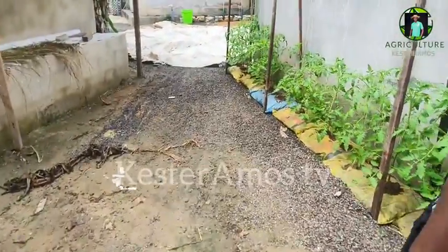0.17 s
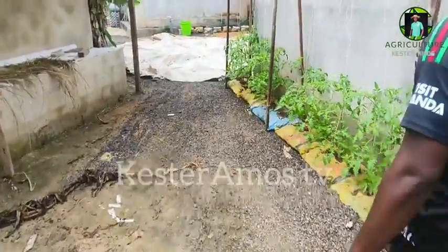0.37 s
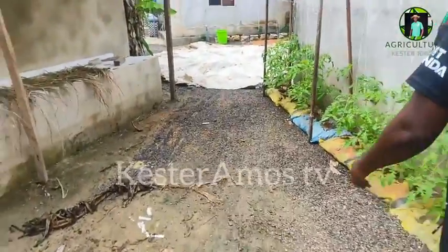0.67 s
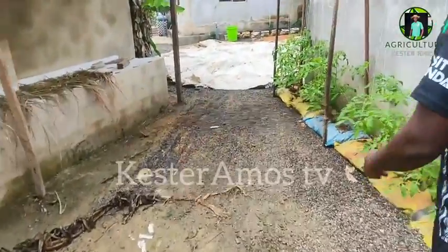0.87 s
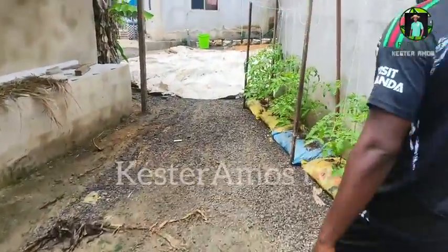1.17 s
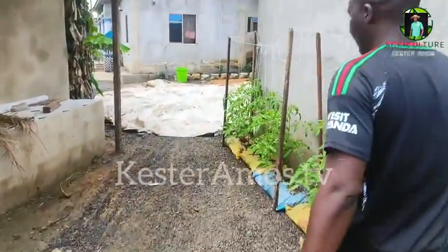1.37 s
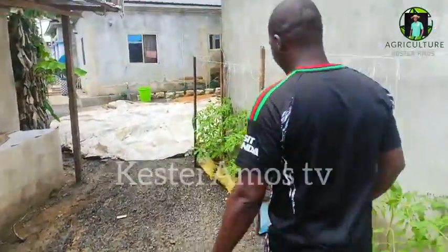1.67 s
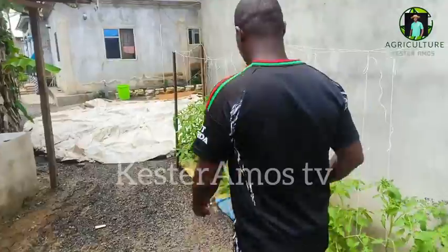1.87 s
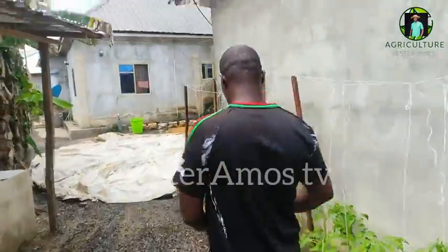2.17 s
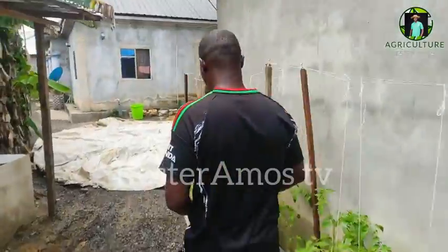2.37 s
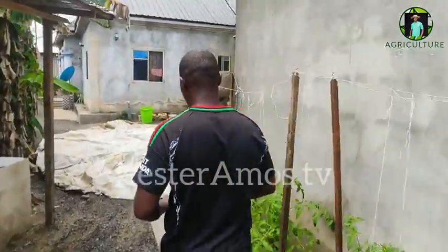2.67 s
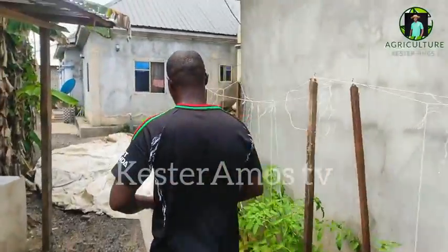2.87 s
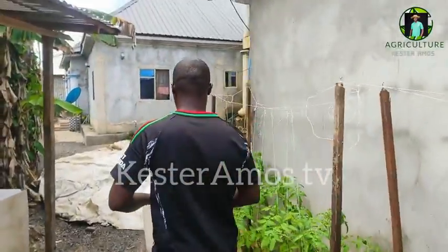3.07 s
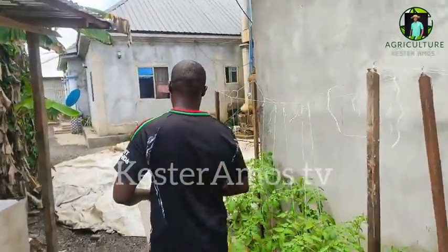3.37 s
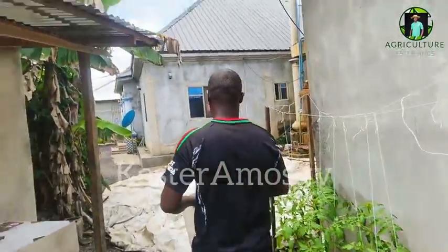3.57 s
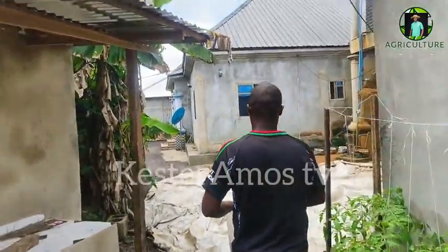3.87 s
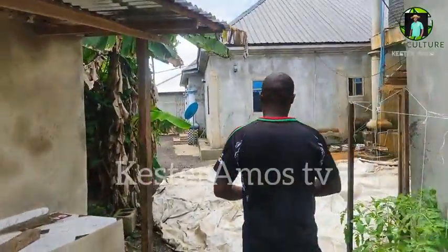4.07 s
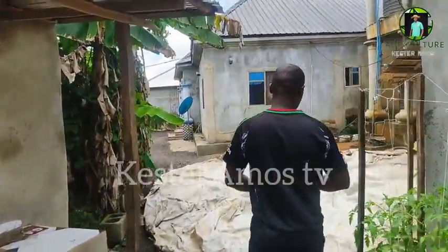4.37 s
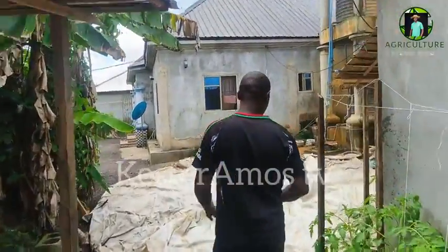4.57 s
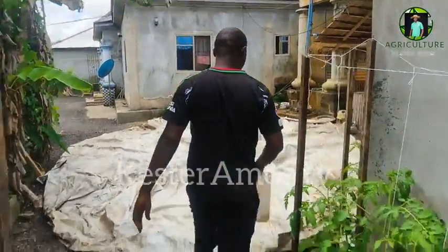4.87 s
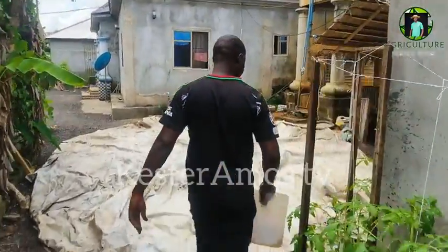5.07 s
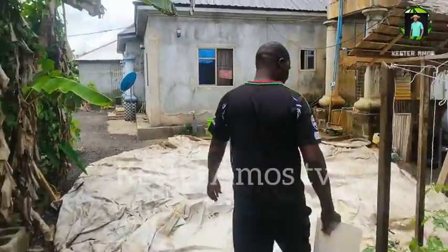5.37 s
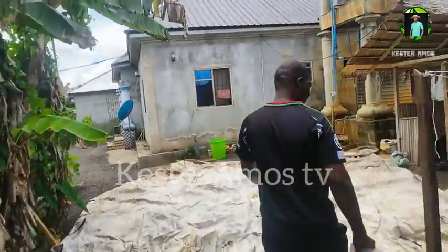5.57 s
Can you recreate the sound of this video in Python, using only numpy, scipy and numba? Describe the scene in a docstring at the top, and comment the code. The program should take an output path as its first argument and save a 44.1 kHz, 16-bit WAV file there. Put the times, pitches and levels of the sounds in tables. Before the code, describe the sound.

A walker carrying a small microphone treads a gravel path beside close walls. The start is almost silent, then gritty, mid-pitched crunches arrive, each with clicking pebbles, a short scrape and low body thumps. Brief whistling swishes join some later strides. Between steps only faint steady air remains, and the crunching continues to the end.

```python
"""Footsteps on gravel between two walls, heard by a small microphone that a walker carries.
At first there is only faint grinding; near 1 s the first strong step comes: knocking grains and cracking stones.
More steps follow, each with low jolts of noise and a wavering hum; narrow noise bands make soles sing.
From 2.9 s some strides add a swish in two whistling noise bands; the loudest crunch comes near 4.5 s.
Crunching goes on to the last swish near 5.7 s; between steps only faint steady air is left."""
import sys
import numpy as np
from scipy import signal
from scipy.fft import rfft, irfft
from scipy.io import wavfile
from scipy.ndimage import uniform_filter1d, map_coordinates
from numba import njit

SR = 44100
rng = np.random.default_rng(int(sys.argv[2]) if len(sys.argv) > 2 else 0)


def persist_wave(psi):
    """Save psi, clipped to +-1, as 16-bit WAV."""
    counts = np.round(np.clip(psi, -1, 1) * 32767).astype(np.int16)
    wavfile.write(sys.argv[1], SR, np.atleast_2d(counts).T)


N = 252693

# All step levels are those before the walls and the path colour are added.
# The sole presses into the gravel: peak t/s, rise/(dB/s), fall/(dB/s), pebble level/dB, pebble f/Hz,
# then grit level/dB, sand level/dB and hollow scrape level/dB, each above the pebbles
SOLE_PRESSES = [(0.0, 2860.0, 61.5, -76.5, 1650, 1, 0, 13), (0.126, 386.5, 286.5, -64, 1584, 1, 3, -28),
                (0.194, 197.5, 242, -59.5, 1377, -4.5, -32, -36.0),
                (0.357, 291, 126.5, -75, 1260, 0.5, -9, 1),
                (0.407, 2500.0, 309.5, -62, 1373, -61, -16, -64),
                (0.962, 1539.5, 216, -44.5, 1334, -1.5, -3.5, -4),
                (0.992, 991.5, 233, -32, 1245, -7, -40, -4),
                (1.147, 191.5, 127, -49.5, 1284, -40, 2.5, 10.5),
                (1.23, 148, 127.5, -59.5, 1573.0, -13, 4.5, 19.5),
                (1.377, 842.5, 150, -33, 1786, -3, -7.5, -2),
                (1.427, 2861, 158, -35.5, 1830, -0.5, -4, -2.5), (1.52, 493.5, 111, -40, 1576, -4, -7, 2),
                (1.652, 89, 501.5, -54.5, 1536, 4, 6.5, 14), (1.81, 5000, 337.5, -46, 1560, 1.5, -6, 9),
                (1.852, 106, 356.5, -75.5, 1484.0, 13.5, 4, 31),
                (2.003, 83, 101, -88.5, 1900, 23, 15.5, 33.5),
                (2.136, 500.5, 180.5, -83, 1345.0, 6, 34, 33),
                (2.167, 590.5, 196.5, -36.5, 1406, -3, -12.5, -11),
                (2.27, 202, 298.5, -53, 1240, -1.5, 0, -24), (2.333, 247.5, 355, -48, 1455, -22, -18, -38),
                (2.402, 430, 101.5, -69.5, 1460, -4, -5, 5), (2.774, 570, 279, -43, 1810, -4.5, -13.5, -10),
                (2.921, 129, 190.5, -61, 1670, 2, 0.5, 2), (3.054, 217.5, 76, -72.5, 1563, -2, -7, 0.5),
                (3.325, 769.5, 244, -33.5, 1827, -4.5, -11, -0.5),
                (3.446, 770, 317, -33.5, 1424, -16, -34, -5), (3.48, 1001, 314, -39, 1560, -4, -18, 0),
                (3.584, 300, 237.5, -46, 1460, 0.5, -9.5, -5),
                (3.787, 2500.0, 53, -46, 2167.0, -8.5, -28, -6.5), (3.89, 177, 93, -50, 1590, -10, -34, -1),
                (3.938, 605, 347, -34.5, 1444, -6.5, -7.5, -6),
                (3.978, 613, 492.5, -29.5, 1364, -13, -20, 2),
                (4.027, 380, 568, -40.5, 1690, -6, -10, -36.0),
                (4.103, 161.5, 245.5, -43.5, 1494, -16.5, -22, -31),
                (4.241, 1049.5, 140.5, -43, 1415, -8, -14.5, -33),
                (4.287, 586, 490.5, -27, 1480, -17.5, -30.5, -19.5),
                (4.361, 1250.0, 285.5, -42, 1276, -33, -30, -4), (4.479, 693, 513, -64, 1197, -9, -4, 2),
                (4.529, 998, 263.5, -25.5, 1665, -9, -12, -5),
                (4.573, 369, 148.5, -38, 1707, -9.5, -32, -5.5),
                (4.658, 1182, 57.5, -62.5, 1340, -22.0, -8, -13),
                (4.838, 609, 290, -34, 1423, -7.5, -18, -2.5),
                (4.911, 909, 206.5, -38, 1590, -7.5, -19, -5.5),
                (5.019, 697, 305, -41, 2165, -8.5, -6, -10),
                (5.159, 1669.5, 252, -49, 1160, -2.5, -27.5, -21),
                (5.204, 347.5, 301, -41.5, 1465, -2.5, -17, -7.5),
                (5.276, 280.5, 498.5, -80, 2170, 28, 28, 27),
                (5.323, 1049, 226, -40.5, 1360, -15, -29, -36.0),
                (5.413, 624.5, 287.5, -42, 1480, 2, -42, -31),
                (5.477, 146, 282.5, -37.5, 1410, -21, -30, -24),
                (5.533, 1431, 282.5, -36, 1510, -9, -30, -3.5),
                (5.633, 1543, 215, -43.5, 1287, -20, -14.5, -36.0)]
# Single stones giving way: t/s, strength level/dB, ring f/Hz, bright tick level/dB above the strength
STONE_CRACKS = [(0.95, -45, 1330, -7), (0.987, -18.5, 1110, -14), (1.008, -16, 1110, -4.5),
                (1.027, -22.5, 1340, -15), (1.35, -32.5, 880, -20), (1.374, -18, 2270, -32),
                (1.396, -15.5, 1275, -18), (1.433, -14.5, 2460, -6), (1.511, -20, 1600, -19),
                (1.594, -33.5, 1340, -6), (1.8086, -30, 1840, 9), (2.0, -40.5, 2500, -15),
                (2.132, -34, 990, -2), (2.168, -26.5, 965, -16), (3.286, -44.5, 2620, 14.5),
                (3.309, -29, 2390, -17), (3.32, -29, 2190, 14.5), (3.435, -20, 1310, -20),
                (3.785, -32.5, 2780, -29), (3.932, -32, 1400, 10), (3.97, -12.5, 1390, -18),
                (4.236, -40, 1710, 6), (4.279, -19, 2250, -28), (4.353, -26.5, 1460, -27),
                (4.474, -32, 833, -12), (4.525, -10, 1960, -20), (4.534, -12.5, 1700, -18),
                (4.658, -27.5, 1340, -20), (4.804, -39, 1000, -16), (4.82, -22.5, 1760, -19),
                (4.849, -15.5, 1580, -29), (4.916, -22, 1590, -4), (5.154, -35, 1010, -10),
                (5.194, -26.5, 1120, -14), (5.326, -19, 1275, -30.5), (5.388, -28, 1280, -18),
                (5.474, -22, 1410, -30), (5.528, -19, 1480, -31), (5.533, -22, 1540, -13),
                (5.632, -25, 1530, -12.5)]
# A dragged or twisted sole sings: start t/s, length t/s, centre f/Hz, one-pass width f/Hz, level/dB
SOLE_SCUFFS = [(0.133, 0.16, 1090, 150, -63), (0.105, 0.14, 4800, 400, -65.5),
               (1.076, 0.25, 2065, 198, -54), (1.086, 0.28, 846, 148, -61), (1.07, 0.23, 3930, 610, -65),
               (1.135, 0.15, 562, 83, -43.5), (1.808, 0.06, 4270, 350, -55), (1.862, 0.32, 724, 149, -57.5),
               (2.239, 0.085, 631, 78, -46), (2.377, 0.041, 1510, 198, -53), (3.041, 0.07, 1560, 300, -66),
               (3.552, 0.075, 917, 60, -48.5), (3.768, 0.093, 323, 49.7, -50),
               (4.088, 0.11, 374, 59.7, -49), (4.741, 0.026, 673, 90, -52), (5.02, 0.21, 490, 50, -50),
               (5.518, 0.064, 345, 150, -44.5)]
# Colour of the path from ground to microphone, rippled by a close reflection: f/Hz, level/dB
PATH_COLOUR = [(250, -1), (400, -8.5), (540, -5.5), (700, -2), (2400, 1.5), (3100, -3.5), (4600, 4.5),
               (5700, -0.5), (6900, 4.5), (8000, -7), (8900, 3), (10200, -6.5), (11200, 3.5), (12300, -2),
               (13000, -52)]
# Shocks through the walker's body, with a low hum that swells alongside: peak t/s, rise/(dB/s), fall/(dB/s),
# jolt level/dB, # thud level/dB above the jolt (before the thud resonance's own level), hum level/dB
BODY_SHOCKS = [(0.0, 2860.0, 148, -48.5, -18.2, -76), (0.146, 90.0, 66, -61.5, -21, -77),
               (0.39, 159, 133, -56, -29, -71.5), (0.994, 800.0, 176, -27, -1, -38.5),
               (1.176, 120.0, 63, -47.5, -16, -68), (1.42, 380.0, 330.0, -46, -14, -60),
               (1.58, 152, 470.0, -40, -13, -78), (1.706, 173, 314, -38.5, -5.5, -44),
               (1.809, 480.0, 162, -52, -25, -57), (1.972, 560.0, 368, -32, -7.5, -48.5),
               (1.978, 150.0, 76, -44, -8, -59), (2.17, 560.0, 420.0, -26.5, -3.5, -47.5),
               (2.185, 710.0, 174, -35.5, 5, -44.5), (2.246, 200.0, 320.0, -37.5, 4.5, -43.5),
               (2.303, 180.0, 150, -40, -11, -54), (2.481, 49, 77, -58, -12, -72),
               (2.772, 802, 162, -36.5, -5, -60), (2.845, 354, 770.0, -67.3, -5.1, -37),
               (2.868, 1179.5, 800.0, -32, -10, -44.5), (2.914, 470.0, 353, -32.5, -13, -40),
               (2.985, 1328, 301, -60, 4, -43), (3.142, 37, 152, -54.5, -23, -69),
               (3.28, 896, 300.0, -56, -11, -68), (3.341, 415, 192, -22.5, -19, -32.5),
               (3.423, 90.0, 118, -33, -7.5, -51.1), (3.517, 1430.0, 670.0, -29, -8, -41.5),
               (3.65, 112, 130.0, -47.5, -12, -44.5), (3.75, 1668, 70.0, -56, -7, -54),
               (3.95, 430.0, 570.0, -64.9, -7.9, -44), (4.039, 180, 198, -28, -9, -42.5),
               (4.126, 400.0, 346, -28.5, -9.5, -57), (4.324, 155, 247, -52, -24, -71),
               (4.474, 176, 2496, -44, -20, -59), (4.557, 345, 743.5, -22, -7, -37),
               (4.634, 384, 203, -34, 4, -41.5), (4.705, 50.0, 63, -48.5, -13, -67.5),
               (4.921, 558, 100.0, -54, -19, -69), (5.049, 300.0, 340.0, -38.5, -16, -60.5),
               (5.21, 605, 305, -43.5, -22, -73), (5.334, 177, 253, -34, -11, -47),
               (5.539, 1430.0, 540.0, -57, -8.7, -64), (5.635, 1331, 327, -44.5, -16, -51)]
# Resonances of jolt, thud and hum: centre f/Hz, one-pass width f/Hz, relative level/dB
JOLT_RESONANCES = [(18.9, 24.3, 5), (53, 320, -14.5)]
THUD_RESONANCES = [(91.6, 35, -3)]
HUM_RESONANCES = [(170.7, 20.8, 1.5), (255.6, 50, -3.5)]
# Swishes: peak t/s, rise/(dB/s), fall/(dB/s), lower band level/dB,
# upper band level/dB above the lower, lower band f/Hz
SWISH_STROKES = [(2.862, 327, 191, -42, 3.5, 3273), (3.201, 252.5, 250, -63.5, -9.5, 3280),
                 (4.412, 399, 245, -51.5, -5, 3334), (4.504, 425, 292, -44.5, 4.5, 3257),
                 (5.018, 395, 245, -45, 7, 3295), (5.058, 402, 398, -43, -3, 3250),
                 (5.12, 333, 396, -52, -0.5, 3340), (5.725, 550, 400, -46.5, 4.5, 3290)]
# The two whistling bands of the swish: centre f/Hz, one-pass width f/Hz, relative level/dB
SWISH_LOW_BAND = [(3314, 230, 0.0055)]
SWISH_HIGH_BAND = [(6800, 380, -4), (6220, 810, -15)]
# Tone of the quiet air in the yard: f/Hz, relative level/dB
AIR_TONE = [(12, -35), (20, -10), (135, -16), (596, -15), (647, -25.5), (1110, -22), (1530, -25),
            (9830, -25.5), (12500, -24.5), (16300, -27.5), (22000, -120)]

AIR_DB = -80.5  # level of the yard air above 100 Hz
STONES_UNDER_SOLE = 7
TOP_HZ = 15700  # the recorder passes nothing much above this
CURVE_STEP = 32  # samples between the points of a slow gain curve


def gravel():
    """Four grain sizes knock under the sole; the load slips in short bursts that all sizes share."""
    press = swells(SOLE_PRESSES)
    pebble_db, pitch_hz, grit_db, sand_db, scrape_db = np.array(SOLE_PRESSES).T[3:]
    pebble_hz = blend(press, pebble_db, pitch_hz)
    scrape_hz = 680 * 2 ** (0.18 * walk(6.2))

    pebbles = grains(count=6000, centre_hz=pebble_hz, octaves=0.954, cycles=4.07, scatter_db=1.5,
                     stones=STONES_UNDER_SOLE)
    grit = grains(count=30000, centre_hz=3810, octaves=1.0, cycles=1.7, scatter_db=1.5)
    sand = grains(count=50000, centre_hz=8450, octaves=0.44, cycles=11.0, scatter_db=-1.5)
    scrape = grains(count=4000, centre_hz=scrape_hz, octaves=0.6, cycles=2.1, scatter_db=1.0)

    # the fine sizes come and go in patches of their own
    patchy_grit = undb(0.96 * walk(40)) * grit
    patchy_sand = undb(0.78 * walk(30.43)) * sand
    slips = undb(0.4 * walk(70))
    mix = together(press, pebble_db) * pebbles
    mix += together(press, pebble_db + scrape_db) * scrape
    mix += together(press, pebble_db + grit_db) * patchy_grit
    mix += together(press, pebble_db + sand_db) * patchy_sand
    return slips * mix


def grains(count, centre_hz, octaves, cycles, scatter_db, stones=None, shift_s=.06):
    """Stones knock at random moments, with random strengths and pitches around a centre; rms 1.
    With a number of stones, only those few ring until the sole shifts on to others."""
    u = rng.random((count, 5)).T
    start = u[0] * (N - 1)
    spread = u[1] - u[4]
    if stones:
        moment = (start / (shift_s * SR)).astype(int)
        which = (u[1] * stones).astype(int)
        under_sole = np.subtract(*rng.random((2, 400, stones)))
        spread = under_sole[moment, which] + 0.08 * (u[4] - .5)
    centre_now = (centre_hz * np.ones(N))[start.astype(int)]
    hz = np.minimum(centre_now * 2 ** (octaves * spread), .45 * SR)
    sign = np.sign(u[3] - .5)
    size = undb(-scatter_db * np.log(1 - u[2])) * sign
    return level(ring(start, hz, np.full(count, cycles), size, N), 0)


@njit
def ring(start, hz, cycles, size, length):
    """Each knock is a sine with a soft start that dies by 1 / e in the given number of cycles."""
    out = np.zeros(length)
    for k in range(len(start)):
        w = 2 * np.pi * hz[k] / SR
        turn = np.exp(1j * w - hz[k] / (SR * cycles[k]))  # one sample of spin and decay
        z = size[k] + 0j
        i = int(start[k])
        contact = 1.
        soft = np.exp(-3 * hz[k] / SR)  # the contact lets go over about a third of a cycle
        while i < length and abs(z) > .004 * abs(size[k]):
            out[i] += z.imag * (1 - contact)
            z, i, contact = z * turn, i + 1, contact * soft
    return out


def cracks(count=16, spray_s=.03, fade_db=14):
    """A stone snaps, then its neighbours shift in a fading spray; each knock has a body and a bright tick."""
    s, strength_db, hz, tick_db = np.array(STONE_CRACKS).T[:, :, None]
    u = rng.random((len(STONE_CRACKS), 4, count))
    later = np.arange(count) > 0
    start = ((s + spray_s * u[:, 0] * later) * SR).ravel()
    size = undb(strength_db - (fade_db * u[:, 0] + 1.0 + 16.0 * u[:, 3]) * later)
    pitch = hz * 2 ** (0.56 * (u[:, 1] - .5) * later)
    body_cycles = np.tile(np.where(later, 3.2, 2.1), len(STONE_CRACKS))
    body = ring(start, pitch.ravel(), body_cycles, size.ravel(), N)
    tick_hz = 3000 * 2.67 ** u[:, 2].ravel()
    tick_size = (undb(tick_db) * size).ravel()
    tick = ring(start, tick_hz, np.full(size.size, 1.5), tick_size, N)
    return body + tick


def scuff():
    """A sole rubs smoothly: noise in narrow bands that swells and fades."""
    out = np.zeros(N)
    for start_s, length_s, hz, width, db in SOLE_SCUFFS:
        a, n = int(start_s * SR), int(length_s * SR)
        rub = resonant_noise([(hz, width, db)])[a:a + n]
        out[a:a + n] += rub * signal.windows.tukey(n, .6)
    return out


def walls(x, t60_s=0.12, wet_db=-14):
    """The walls beside the path add a short dense tail: noise that dies by 60 dB in t60_s."""
    t = np.arange(int(.3 * SR)) / SR
    tail = rng.standard_normal(len(t)) * 1000. ** (-t / t60_s) * (t > .004)
    tail /= np.sqrt(np.sum(tail ** 2))
    return x + undb(wet_db) * signal.fftconvolve(x, tail)[:N]


def jolts_and_hum():
    """Footfalls shake the body: slow noise shocks and a dull thud; a low hum in rough lines comes and goes with
    them."""
    shake = swells(BODY_SHOCKS, crest_db=2.0)
    jolt_db, thud_db, hum_db = np.array(BODY_SHOCKS).T[3:]
    jolt = level(resonant_noise(JOLT_RESONANCES), 0)
    thud = resonant_noise(THUD_RESONANCES)
    hum = level(resonant_noise(HUM_RESONANCES), 0)
    return (together(shake, jolt_db) * jolt
            + together(shake, jolt_db + thud_db) * thud
            + together(shake, hum_db) * hum)


def swish():
    """Rubbing noise in two bands, catching unevenly; the lower one bends from swish to swish."""
    low, high = resonant_noise(SWISH_LOW_BAND), resonant_noise(SWISH_HIGH_BAND)
    rub = swells(SWISH_STROKES, crest_db=2.5)
    low_db, high_db, low_hz = np.array(SWISH_STROKES).T[3:]
    # reading the noise faster or slower moves its pitch
    speed = blend(rub, low_db, low_hz) / SWISH_LOW_BAND[0][0]
    low = map_coordinates(low, [np.cumsum(speed)], mode="mirror")
    catching = undb(0.58 * walk(150))
    return catching * (together(rub, low_db) * low + together(rub, low_db + high_db) * high)


def yard():
    """Faint steady air: tone-shaped noise whose level is a little unsteady."""
    air = shaped(rng.standard_normal(N), AIR_TONE)
    above = signal.sosfilt(signal.butter(2, 100, "high", fs=SR, output="sos"), air)
    return air * undb(AIR_DB + 0.88 * walk(6.7)) / np.std(above)


def resonant_noise(modes):
    """Noise heard through resonances, each passed twice for steep skirts."""
    out = 0
    for hz, width, db in modes:
        b, a = signal.iirpeak(hz, hz / width, SR)
        once = signal.lfilter(b, a, rng.standard_normal(N))
        out = out + level(signal.lfilter(b, a, once), db)
    return out


def swells(table, crest_db=3):
    """One gain curve a row: a steady climb in dB, a rounded crest, then a steady fall."""
    peak_s, rise, fall = np.array(table)[:, :3].T[:, :, None]
    late = np.arange(0, N + CURVE_STEP, CURVE_STEP) / SR - peak_s
    slope = np.where(late < 0, rise, fall)
    return undb(crest_db - np.hypot(late * slope, crest_db))


def together(gains, db):
    """Overlapping swells at their own levels add in power."""
    return every_sample(np.sqrt(undb(2 * db) @ gains ** 2))


def blend(gains, db, values):
    """A value per swell, blended so that the loudest swell of the moment leads."""
    power = undb(2 * db)[:, None] * gains ** 2 + 1e-300  # never divide by zero
    return every_sample(values @ power / power.sum(axis=0))


def every_sample(curve):
    """Fill in a slow curve with straight lines."""
    return np.interp(np.arange(N) / CURVE_STEP, np.arange(len(curve)), curve)


def walk(rate):
    """Random levels held 1 / rate s and smoothed twice; typical spread near 2.2."""
    k = int(SR / rate)
    held = np.repeat(rng.standard_normal(N // k + 1), k)
    return 2.99 * uniform_filter1d(uniform_filter1d(held, k), k)[:N]


def shaped(x, spectrum):
    """Sound filtered by a (f/Hz, level/dB) curve."""
    hz, db = np.transpose(spectrum)
    f = np.maximum(np.arange(N // 2 + 1) * SR / N, 1)
    return irfft(rfft(x) * undb(np.interp(np.log(f), np.log(hz), db)), N)


def causal(x, spectrum, size=2048):
    """Sound through a (f/Hz, level/dB) curve whose ringing all comes after the blow."""
    hz, db = np.transpose(spectrum)
    f = np.maximum(np.arange(size // 2 + 1) * SR / size, 1)
    gain = undb(np.interp(np.log(f), np.log(hz), db))
    # folding the cepstrum on to positive time gives the minimum-phase filter
    cepstrum = irfft(np.log(gain), size)
    cepstrum[1:size // 2] *= 2
    cepstrum[size // 2 + 1:] = 0
    response = irfft(np.exp(rfft(cepstrum)), size)
    return signal.fftconvolve(x, response)[:N]


def undb(db):
    """Turn dB into a plain gain."""
    return 10 ** (np.asarray(db) / 20)


def level(x, db):
    """Set the rms level of a sound."""
    return x * undb(db) / np.sqrt(np.mean(x ** 2))


def scene():
    """Steps reach the microphone by way of walls and path; the other sounds arrive directly."""
    steps = causal(walls(gravel() + cracks() + scuff()), PATH_COLOUR)
    return (steps + swish() + jolts_and_hum() + yard())[None]


def record(dry):
    """The recorder cuts the top with a steep low-pass filter."""
    return signal.sosfilt(signal.ellip(8, .2, 70, TOP_HZ, fs=SR, output="sos"), dry)


dry = scene()
out = record(dry)
persist_wave(out)
```